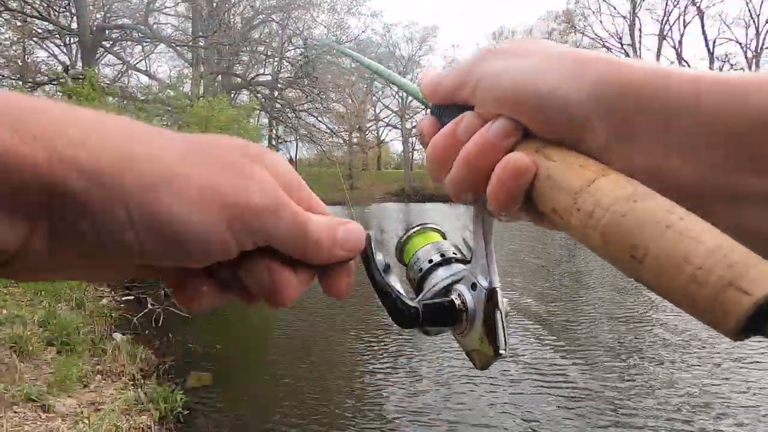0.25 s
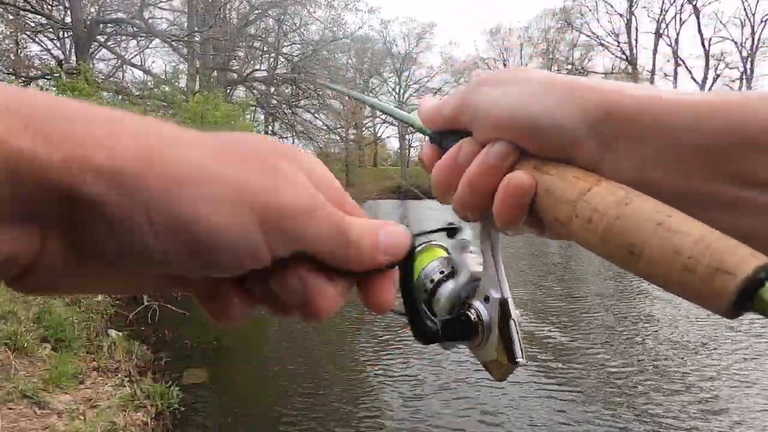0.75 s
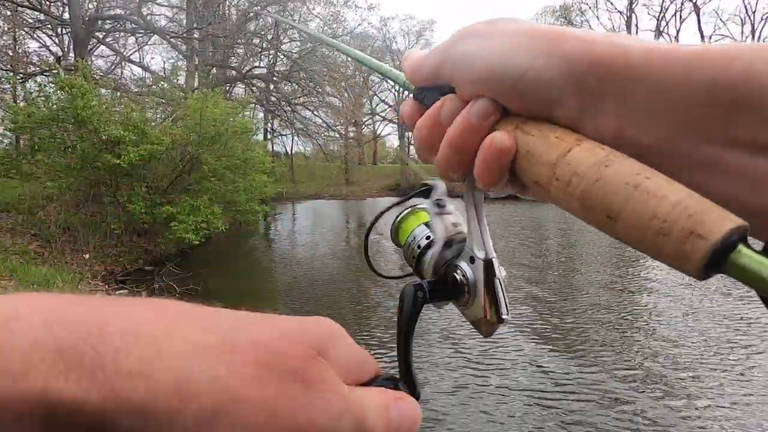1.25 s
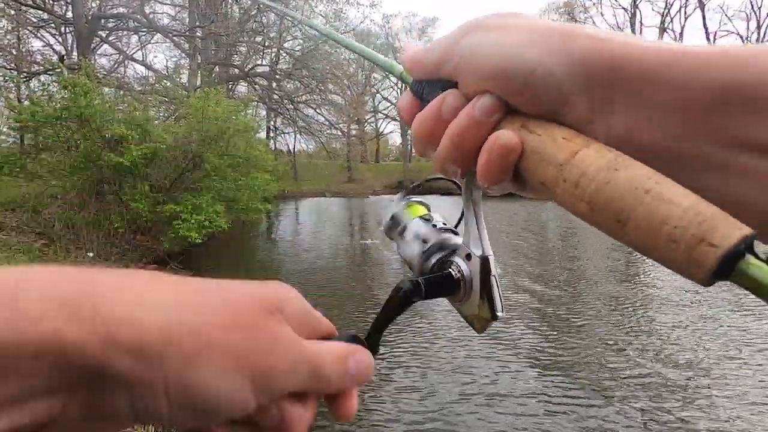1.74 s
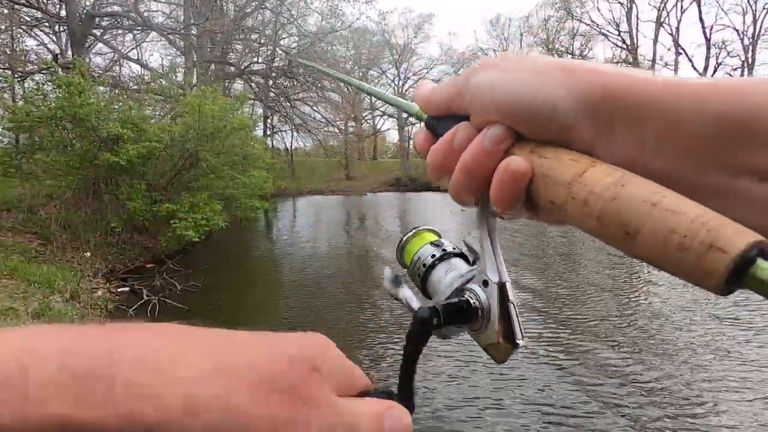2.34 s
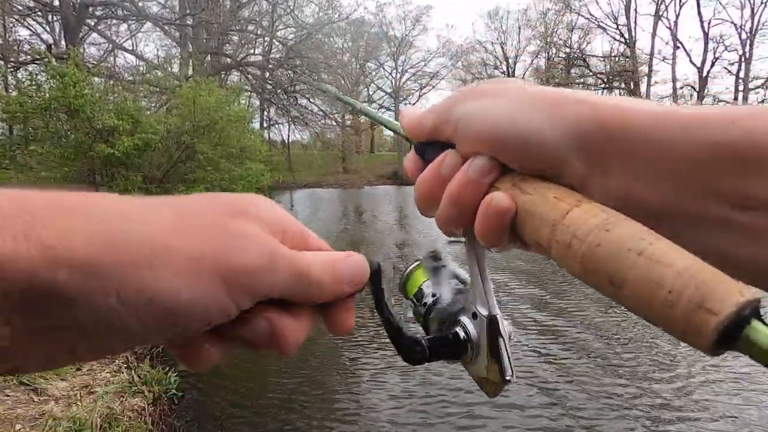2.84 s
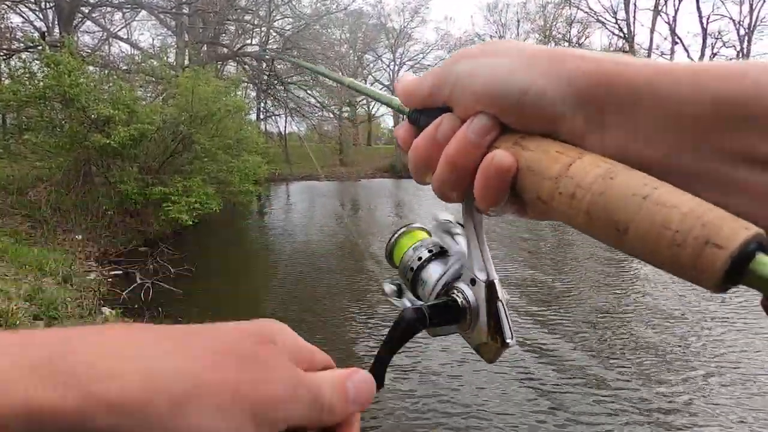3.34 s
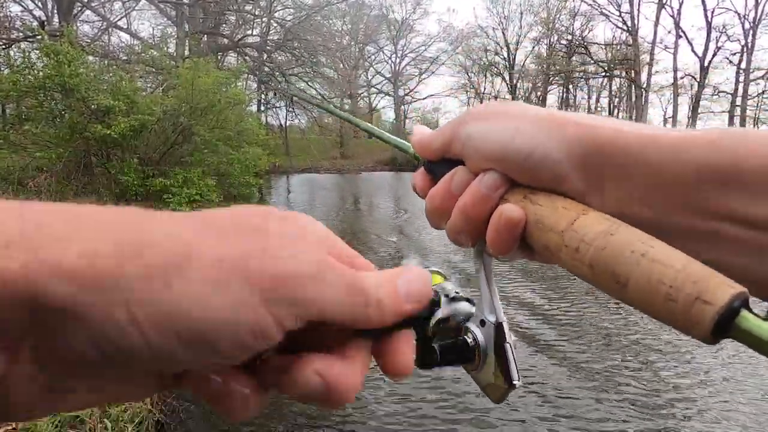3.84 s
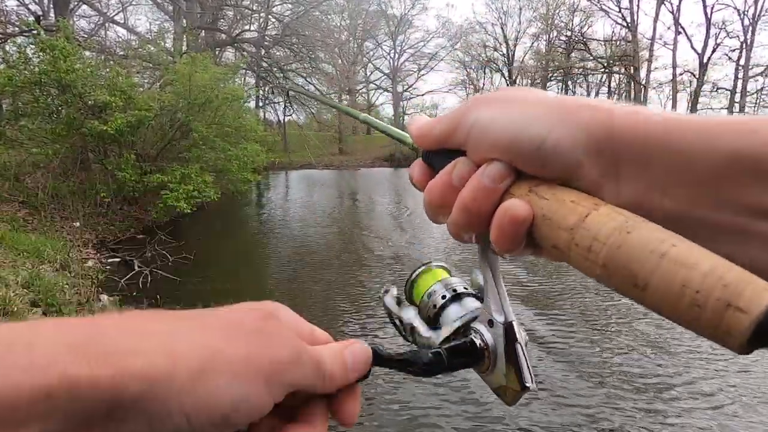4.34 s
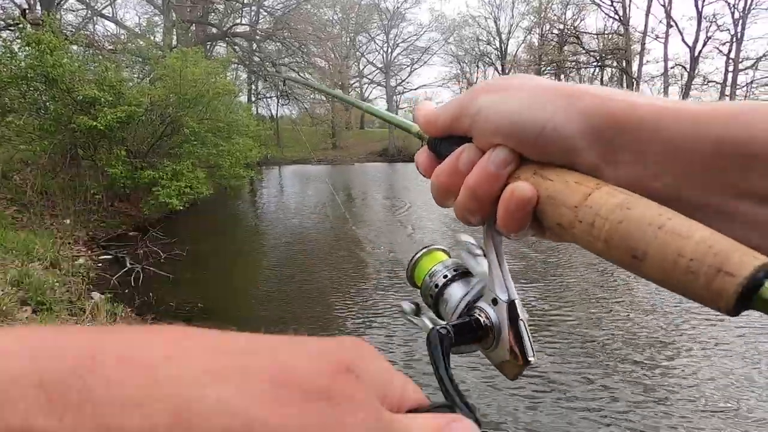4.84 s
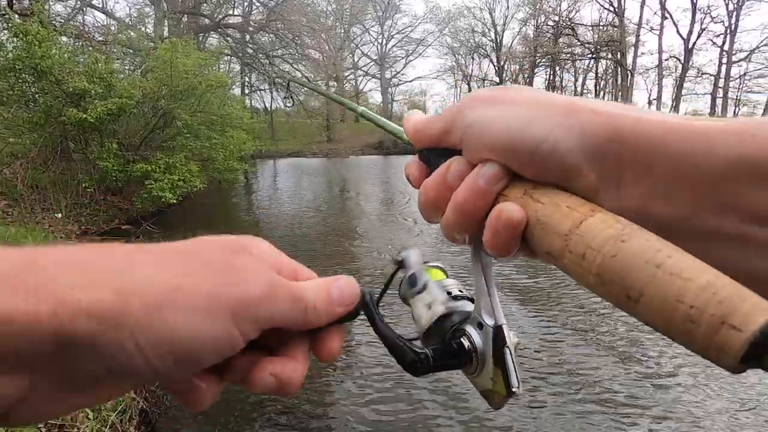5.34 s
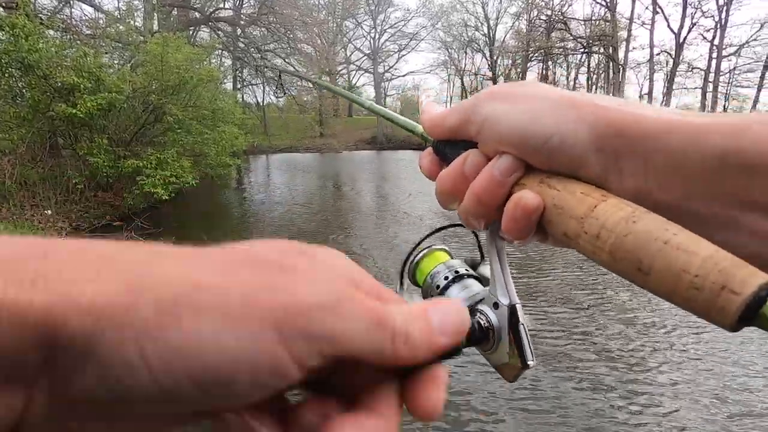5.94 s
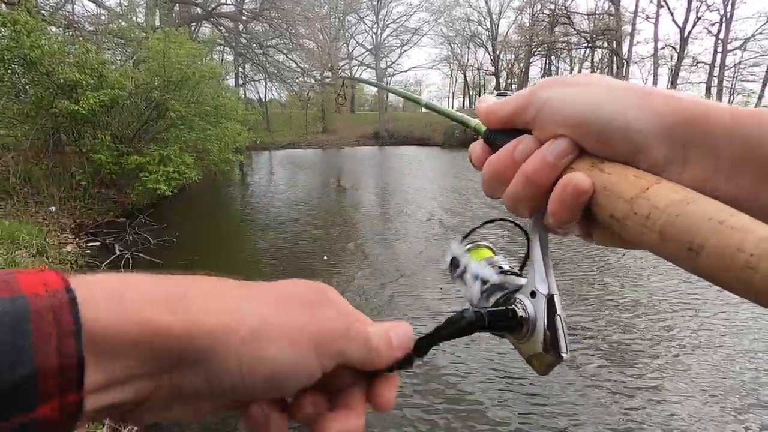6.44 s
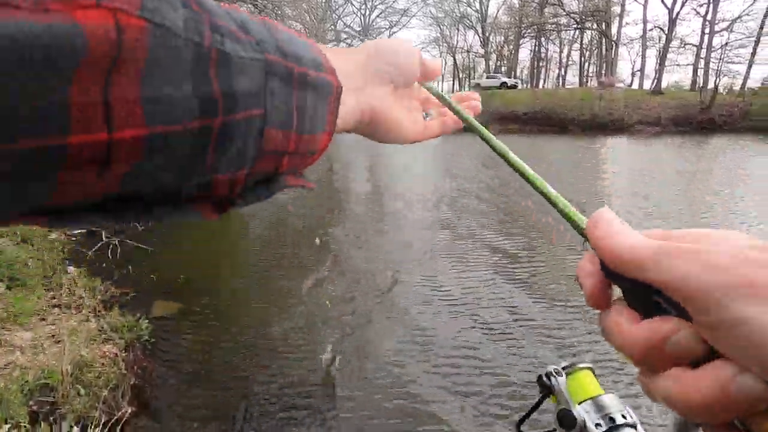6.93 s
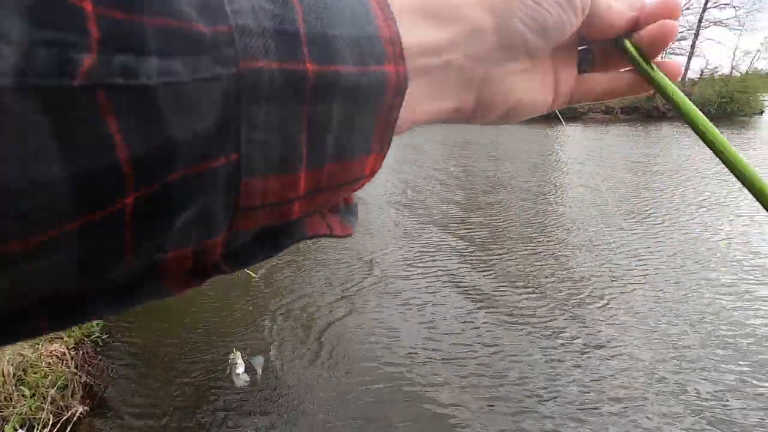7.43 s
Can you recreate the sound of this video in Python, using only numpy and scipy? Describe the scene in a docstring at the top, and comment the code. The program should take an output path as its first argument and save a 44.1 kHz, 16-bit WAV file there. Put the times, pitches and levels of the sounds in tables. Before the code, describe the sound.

Bursts of fast dry drag clicks from a fishing reel, then watery plops and splashing, a sharp rod knock, and wind rumbling on the microphone.

```python
"""A burst of drag clicks opens the scene as a hooked fish is reeled in across a pond on a breezy day.
Each click is impact excitation: a noise snap and the decaying modes of spool and spring. Splashes are
noise bursts and ringing bubbles; ticks, a coasting rotor, creaks and a knocked rod are struck or rubbed
resonators. Far birds whistle as gliding tones. Shaped noise gives wind on the microphone, rustling trees
and a treble hiss, over a faint wavering hum."""
import sys
import numpy as np
from scipy import signal
from scipy.fft import rfft, irfft, next_fast_len
from scipy.io import wavfile
from scipy.ndimage import uniform_filter1d

SR = 44100
rng = np.random.default_rng(int(sys.argv[2]) if len(sys.argv) > 2 else 0)


def dump_mix(stems):
    """Bounce the given channels to the path in sys.argv[1] as a 16-bit WAV at rate SR."""
    frames = np.atleast_2d(stems).T  # one column per channel
    limited = np.clip(frames, -1, 1)  # hard clip at full scale
    pcm = np.round(limited * 32767).astype(np.int16)
    wavfile.write(sys.argv[1], SR, pcm)


N = 338765   # samples

# Teeth of the drag clicker. Each row: time in seconds, body peak in dB, starting level of the
# spring's ring in dB, peak of the treble modes in dB.
CLICKER_TEETH = [(0.0323, -40, -60, -52), (0.059, -43, -61, -51), (0.0694, -39, -64, -52),
                 (0.082, -37, -63, -46), (0.097, -33, -65, -51), (0.221, -40, -73, -49),
                 (0.2534, -36, -62, -48), (0.2718, -39, -61, -48), (0.2824, -39, -60, -51),
                 (0.293, -44, -60, -54), (0.3064, -41, -75, -52), (0.326, -44, -78, -55),
                 (0.3383, -42.5, -63, -55), (0.349, -37, -56, -53), (0.3588, -40, -63, -52),
                 (0.3703, -38.5, -61, -47), (0.382, -41, -57, -56), (0.395, -44, -54, -50),
                 (0.4345, -40, -58, -54), (0.5495, -42, -55, -56), (0.573, -51, -66, -53),
                 (0.5862, -43, -52, -55), (0.596, -40, -53, -53), (0.604, -39, -58, -56),
                 (0.611, -41, -56, -52), (0.619, -40, -70, -53), (0.628, -41, -71, -51),
                 (0.6384, -40, -71, -54), (0.6521, -39, -56, -56), (0.848, -44, -67, -52),
                 (0.865, -36.5, -73, -52), (0.8814, -43, -65, -51), (0.903, -43, -72, -49),
                 (0.9267, -40, -64, -54), (2.607, -40.5, -57, -52), (2.6714, -43.5, -72, -52),
                 (2.8572, -41, -64, -55), (2.9, -37, -68, -55), (2.915, -39, -78, -50),
                 (2.9266, -43, -58, -54), (2.938, -42, -62, -53), (2.9514, -39, -58, -55),
                 (2.9705, -40.5, -69, -54), (4.2413, -45, -74, -55)]
# Low and high modes of the spool. Each row: frequency in Hz, relative level in dB, T60 in seconds.
SPOOL_LOW_MODES = [(1700, -10, 0.0039), (2400, -3, 0.0026), (3170, -10.5, 0.0043), (4160, -8, 0.005),
                   (4650, -10, 0.004), (6295, -14.5, 0.011), (6900, -15.5, 0.0066)]
SPOOL_HIGH_MODES = [(8100, -10, 0.003), (10620, -11, 0.0059), (11620, -7, 0.0055), (12560, -10, 0.0043),
                    (14230, -8, 0.0035), (14370, -12, 0.004)]
SPRING_HZ, SPRING_T60_S = 6628, 0.16
SNAP_DB, SNAP_DECAY_S = 0.5, 0.00071      # broad snap: gain on the treble peak level, time constant
RATTLE_ON_DB, RATTLE_ON_DECAY_S = -16, 0.012   # the spool rattles on: level against the snap, time constant
# Ticks of line, bail and handle. Each row: time in seconds, nominal level in dB, ring frequency in Hz.
REEL_TICKS = [(1.2187, -37, 3950), (1.5895, -42, 3800), (1.658, -38, 3520), (1.7, -36, 4100),
              (3.352, -49, 3900), (3.598, -51, 2600), (3.6653, -37, 3860), (3.7928, -42, 3750),
              (3.904, -39, 3800), (4.14, -38, 4300), (4.2118, -43, 3520), (4.225, -38, 3370),
              (4.277, -34, 3800), (4.5014, -40, 4080), (5.8805, -37, 5130), (5.905, -39, 4410),
              (6.003, -33.5, 6160), (6.253, -41, 3480), (6.593, -33.5, 3570), (6.597, -41, 6500),
              (6.62, -50, 6200), (6.64, -51, 4200), (6.66, -54, 5600), (6.68, -52, 6000),
              (6.725, -52, 5960), (6.731, -45, 4830), (6.833, -49, 6000), (6.846, -48, 5700),
              (6.858, -49, 5360), (6.94, -50, 4700), (6.955, -43, 3500), (6.99, -50, 4300),
              (7.009, -51, 5200)]
# Rattle of the coasting rotor. Each row: time in seconds, rms level in dB.
RATTLE_LEVEL = [(6.25, -140), (6.27, -83), (6.29, -77), (6.335, -73), (6.36, -92), (6.385, -55.5),
                (6.41, -64), (6.44, -62), (6.465, -66), (6.5, -54.5), (6.53, -60), (6.55, -70),
                (6.575, -85), (6.6, -140)]
# Resonances of the rotor. Each row: frequency in Hz, width in Hz, relative level in dB.
ROTOR_MODES = [(2950, 450, 5), (3230, 650, 13), (3520, 120, -10), (6600, 150, -4), (5300, 500, -11),
               (7150, 570, -12), (10000, 300, -26)]
# Squeak of the rotor bearing. Each row: time in seconds, rms level in dB before roughness.
SQUEAK_LEVEL = [(6.27, -140), (6.28, -90), (6.295, -75), (6.34, -75), (6.36, -88), (6.385, -65),
                (6.44, -73), (6.465, -78), (6.505, -67), (6.53, -72), (6.56, -88), (6.58, -140)]
SQUEAK_HZ, SQUEAK_WAVER_HZ, SQUEAK_ROUGH_DB = 5280, 35, 2.5   # the last two are rms swings
# The hand on the rod. Each row: time in seconds, peak of the modes in dB.
ROD_KNOCKS = [(6.973, -24)]
# Modes of the rod. Each row: frequency in Hz, relative level in dB, T60 in seconds.
ROD_MODES = [(860, -10, 0.0067), (1800, 4, 0.0067), (2400, -16, 0.0028), (3000, -4, 0.0064),
             (3800, 0, 0.0041), (4700, 0, 0.003), (5570, 0, 0.0043), (6800, -19, 0.0037),
             (7800, -33, 0.0028), (9400, -27, 0.0018), (11400, -30, .003)]
# Short buzzes, perhaps the tight line creaking in a guide. Each row: start in seconds, end in seconds,
# resonance in Hz, rms level in dB before the swell.
LINE_BUZZES = [(2.534, 2.595, 2600, -61.5), (2.858, 2.916, 3060, -62), (5.111, 5.153, 2390, -52),
               (5.161, 5.19, 2420, -55), (5.205, 5.26, 2350, -60), (5.344, 5.408, 2480, -56.5),
               (5.458, 5.517, 2400, -52.5)]
SLIPS_PER_S = 270
# Brief hisses of line on the roller. Each row: start in seconds, peak in dB, time constant in seconds.
ROLLER_HISSES = [(3.5163, -64, .0015), (3.663, -62, .0015), (3.7219, -64, .0015), (3.9164, -63, .0015),
                 (3.9284, -61, .0015), (4.1255, -66, .002), (4.1948, -65, .02), (4.9572, -64, .004),
                 (5.0121, -63, .004), (5.195, -61, .0015), (5.209, -64, .0015), (5.2879, -65, .003),
                 (5.415, -64, .012), (5.4251, -55, .004), (5.442, -61, .002), (5.485, -63, .003),
                 (5.5538, -65, .003), (5.5806, -64, .02), (5.75, -65, .002), (5.7753, -66, .003),
                 (5.8128, -64, .002), (5.8866, -62, .004), (5.9049, -62, .015), (5.928, -62, .002),
                 (6.0028, -59, .005), (6.0591, -66, .002), (6.0866, -65, .002), (6.148, -63, .003),
                 (6.1598, -60, .0015), (6.1987, -59, .0012), (6.2627, -60, .003), (6.3863, -72, .003),
                 (6.5925, -52, .004), (6.7191, -62, .002)]
# Whirr of the gears. Each row: time in seconds, rms level in dB.
GEAR_LEVEL = [(0, -76), (.45, -72), (.75, -73.5), (.9, -72), (1.1, -81), (1.8, -76.5), (2.2, -77.5),
              (4.5, -79.5), (5.0, -73.5), (5.5, -78), (6.3, -75.5), (6.6, -77), (7.3, -86)]
# Spectrum of the whirr. Each row: frequency in Hz, relative density in dB per Hz.
GEAR_SPECTRUM = [(4500, 1), (6300, 14), (7400, 7.5), (9000, -10), (11500, -18), (13500, -7), (15800, -25)]

# Tail slaps. Each row: time in seconds, starting rms level in dB, middle frequency in Hz, T60 in seconds.
TAIL_SLAPS = [(3.349, -59, 1680, 0.32), (3.352, -53, 2300, 0.016), (3.443, -49, 1290, 0.09),
              (3.451, -46, 1190, 0.18), (3.65, -51.5, 1030, 0.67), (3.764, -44, 990, 0.025),
              (3.794, -53, 2200, .02), (3.904, -42, 2120, 0.025), (4.009, -52, 1480, 0.16),
              (4.198, -54.5, 2170, 0.52), (4.599, -57, 1390, 0.25), (4.744, -54, 1850, 0.11),
              (4.956, -54, 1270, 0.68), (4.957, -37, 890, 0.033), (5.014, -37, 805, 0.034),
              (5.015, -48.5, 1680, 0.088), (5.425, -48, 1300, 0.12), (5.442, -39, 420, 0.034),
              (5.442, -40.5, 1340, 0.047), (5.881, -50, 3230, 0.058), (5.989, -45, 1440, 0.16),
              (6.591, -49, 1520, 0.11)]
# Louder bubbles of the splashing. Each row: time in seconds, peak in dB, starting frequency in Hz.
SPLASH_BUBBLES = [(1.105, -53, 1340), (1.138, -46, 1380), (1.149, -45, 704), (1.205, -51, 950),
                  (1.233, -49, 1110), (1.246, -51, 1230), (1.259, -53, 950), (1.272, -46, 1740),
                  (1.382, -46, 1700), (1.389, -55, 805), (1.412, -45, 1680), (1.57, -47, 1800),
                  (1.656, -47, 1480), (1.68, -49, 670), (1.499, -55, 2600), (1.543, -51, 1490),
                  (1.641, -47, 1870), (1.719, -45.5, 1300), (1.77, -53, 705), (1.764, -46, 2120),
                  (1.781, -49, 1810), (2.138, -51, 2280), (2.157, -52, 834), (2.208, -50, 467),
                  (2.219, -50, 517), (3.336, -47.5, 900), (3.352, -51, 2510), (3.358, -42.5, 1960),
                  (3.371, -44, 990), (3.376, -50, 2080), (3.38, -45, 1060), (3.379, -43, 1520),
                  (3.422, -48, 1710), (3.438, -58, 2670), (3.451, -40, 650), (3.454, -43, 1150),
                  (3.451, -40, 1920), (3.485, -46, 1050), (3.511, -48, 2450), (3.518, -47, 780),
                  (3.557, -46, 680), (3.632, -32.5, 1660), (3.651, -38, 790), (3.666, -46, 700),
                  (3.666, -41, 1780), (3.684, -51, 1720), (3.699, -51, 860), (3.712, -48, 1460),
                  (3.72, -40, 714), (3.734, -44, 2140), (3.764, -45, 960), (3.793, -43.5, 720),
                  (3.832, -44, 690), (3.856, -44, 2050), (3.905, -46, 1450), (3.928, -45, 1600),
                  (3.954, -46.5, 900), (3.902, -46, 1750), (3.925, -45, 2370), (3.988, -42.5, 1600),
                  (4.006, -42, 2060), (4.02, -46, 1350), (4.056, -48, 1320), (4.009, -29.5, 676),
                  (4.007, -41, 1430), (4.109, -40.5, 1340), (4.117, -42.5, 1330), (4.196, -42, 1930),
                  (4.14, -45, 1730), (4.208, -43, 1800), (4.208, -42, 1550), (4.21, -53, 2520),
                  (4.263, -42, 2260), (4.303, -51, 2400), (4.582, -47.5, 2500), (4.594, -46, 720),
                  (4.607, -40.5, 1640), (4.65, -44.5, 1700), (4.651, -44, 422), (4.742, -44.5, 2140),
                  (4.743, -47, 970), (4.764, -48, 1190), (4.957, -58, 1820), (4.651, -41, 760),
                  (4.678, -43.5, 700), (4.958, -34, 1090), (4.964, -40, 685), (4.98, -37, 850),
                  (4.988, -46, 2455), (4.994, -45, 990), (5.017, -48, 2110), (4.992, -46, 1400),
                  (5.006, -42, 2480), (5.013, -36, 746), (5.021, -40, 1490), (5.024, -43, 450),
                  (5.033, -37, 1450), (5.125, -46, 790), (5.152, -42, 1710), (5.179, -42, 1050),
                  (5.374, -39.5, 710), (5.386, -42, 1770), (5.405, -41, 1630), (5.379, -53, 2455),
                  (5.424, -42, 1670), (5.427, -43, 1390), (5.434, -40, 1060), (5.445, -44, 2430),
                  (5.469, -44, 1440), (5.482, -42, 1450), (5.444, -32.5, 1440), (5.444, -38, 1940),
                  (5.443, -49, 840), (5.469, -42, 1090), (5.486, -45, 620), (5.558, -36.5, 1460),
                  (5.581, -43, 1020), (5.619, -42, 1030), (5.678, -45, 1500), (5.705, -45.5, 784),
                  (5.727, -39.5, 2220), (5.682, -45, 1120), (5.705, -45, 2100), (5.712, -41.5, 930),
                  (5.73, -45, 640), (5.767, -41, 2510), (5.831, -46, 3050), (5.858, -43, 2540),
                  (5.884, -40, 2200), (5.958, -44, 880), (5.979, -43, 1220), (5.985, -49, 2400),
                  (5.993, -45, 1160), (6.0, -42, 2950), (5.887, -41, 2720), (5.957, -44, 1490),
                  (6.004, -38, 504), (6.055, -44, 794), (6.086, -44, 1210), (6.11, -43, 1230),
                  (6.123, -46, 1700), (6.154, -45, 525), (6.197, -46, 3240), (6.297, -48, 1400),
                  (6.387, -49, 3060), (6.406, -49, 2220), (6.429, -44, 3280), (6.443, -44, 1740),
                  (6.591, -57, 500), (6.602, -51, 1830), (6.618, -48, 880), (6.699, -42.5, 1700),
                  (6.707, -45, 2300), (6.717, -46, 1770), (6.592, -39, 910), (6.606, -44, 910),
                  (6.605, -44, 2700), (6.665, -53, 2280), (6.7, -50, 1920), (6.719, -46, 2200),
                  (6.821, -47, 2640)]
BUBBLE_CYCLES, BUBBLE_ONSET_CYCLES = 26.2, 0.61   # length, at which it is 60 dB down; onset scale
BUBBLE_CHIRP = 0.0045   # extra phase in cycles per squared cycle
BUBBLE_HOLD = 1.05   # exponent of the decay: above 1 the ring holds at first, then dies quickly
# Long gurgles. Each row: start in seconds, length in seconds, first, middle and last frequency in Hz,
# rms level in dB at the height of the swell.
LONG_GURGLES = [(1.575, 0.0062, 435, 430, 480, -44), (3.722, 0.032, 467, 482, 468, -50),
                (4.03, 0.013, 613, 673, 593, -38.5), (4.043, 0.012, 720, 820, 950, -48),
                (4.202, 0.0297, 790, 877, 1170, -40), (5.272, 0.029, 420, 410, 414, -44.5),
                (5.305, 0.013, 700, 783, 1040, -35.5), (5.646, 0.055, 350, 344, 352, -50),
                (5.99, 0.022, 430, 480, 570, -53), (6.084, 0.061, 300, 300, 434, -46.5),
                (6.277, 0.032, 840, 878, 970, -48)]
# Churned water. Each row: time in seconds, slosh rms level in dB, spray rms level in dB.
CHURN_LEVELS = [(0.0, -57.5, -63), (0.28, -61.5, -61.5), (0.62, -62, -64.5), (1.16, -61.5, -65),
                (1.47, -61.5, -58.5), (2.14, -58, -62.5), (2.39, -59.5, -65), (3.21, -64.5, -67),
                (3.59, -58, -61), (3.89, -56, -58), (4.43, -64, -66.5), (4.72, -62, -64.5),
                (5.0, -54.5, -63), (5.15, -61.5, -58), (5.65, -58, -55.5), (6.67, -61, -64),
                (7.12, -60, -71), (7.68, -62.5, -109)]
# Spectra of the small bubbles. Each row: frequency in Hz, relative level in dB.
SLOSH_SPECTRUM = [(250, -6.5), (400, -5.5), (750, -0.5), (1100, -4.5), (1500, -24)]
SPRAY_SPECTRUM = [(900, -6.5), (1500, -3.5), (2400, -2.5), (3500, -7), (5000, -8.5), (6500, -49),
                  (8000, -56)]

# Bird whistles. Each row: start in seconds, length in seconds, first, middle and last frequency in Hz,
# rms level in dB at the height of the swell, before the flutter.
BIRD_WHISTLES = [(.135, 0.024, 2400, 2400, 2400, -60.5), (.18, 0.05, 2420, 2400, 2290, -63),
                 (.94, 0.038, 2280, 2150, 2060, -63), (2.02, 0.03, 2720, 2620, 2560, -66),
                 (2.097, .056, 2220, 2370, 2200, -63), (2.172, .016, 2830, 2660, 2520, -63),
                 (2.186, 0.038, 2510, 2490, 2520, -59), (2.664, 0.024, 2960, 2820, 2720, -55.5),
                 (3.064, 0.047, 4250, 3780, 3000, -69), (3.109, .012, 2950, 2800, 2620, -56.5),
                 (3.173, 0.033, 2500, 2560, 2600, -62), (3.2, 0.027, 2620, 2720, 2530, -54.5),
                 (3.24, 0.089, 2290, 2280, 2250, -59), (3.715, 0.022, 2840, 2730, 2600, -60),
                 (3.817, 0.04, 2520, 2790, 2720, -56), (7.148, 0.085, 3150, 3170, 3130, -75)]

# Wind on the microphone. Each row: time in seconds, buffeting and rumble rms levels in dB before gusting.
WIND_LEVELS = [(0, -41.5, -64), (.15, -38, -55), (.9, -39, -53.5), (1.25, -40, -56.5), (1.45, -47, -51.5),
               (2.1, -40, -52), (2.5, -41, -52), (3.3, -45, -52.5), (4.2, -47.5, -52), (4.9, -45, -51),
               (5.1, -37.5, -51.5), (5.42, -35.5, -51), (5.6, -44.5, -52.5), (6.1, -42, -49.5),
               (6.6, -38, -51.5), (6.75, -32.5, -43), (7.0, -32, -49.5), (7.08, -22.5, -40.5),
               (7.16, -18.5, -41.5), (7.23, -35, -44.5), (7.5, -27.5, -45.5), (7.68, -35.5, -55)]
# Spectra of the wind. Each row: frequency in Hz, relative density in dB per Hz.
BUFFET_SPECTRUM = [(3, -6.5), (8, -2), (20, -0.5), (35, -18), (60, -25.5), (100, -32.5)]
RUMBLE_SPECTRUM = [(25, -38), (45, 3), (70, -4.5), (110, -5), (160, -12), (250, -21.5), (400, -28)]
GUST_RATE_HZ, GUST_SWING_DB = 2.5, 1.2   # bandwidth and rms swing of the random gusting
# Far rustle of trees. Each row: time in seconds, rms level in dB before its slow drift.
RUSTLE_LEVEL = [(0, -60), (1.2, -59.5), (6.7, -59), (7.1, -63), (7.68, -63)]
# Spectrum of the rustle. Each row: frequency in Hz, relative density in dB per Hz.
RUSTLE_SPECTRUM = [(150, -4), (250, -8.5), (450, -9.5), (750, -10), (1300, -11.5), (2500, -17), (5000, -26),
                   (8300, -41.5), (11000, -61)]
# Steady treble hiss. Each row: time in seconds, rms level in dB.
TREBLE_LEVEL = [(0, -79), (1.05, -79.5), (1.54, -77.5), (2.44, -80), (3.87, -78.5), (4.47, -79.5),
                (5.71, -79.5), (6.6, -78), (7.25, -79), (7.68, -79)]
# Spectrum of the treble hiss. Each row: frequency in Hz, relative density in dB per Hz.
TREBLE_SPECTRUM = [(5500, -1), (7000, -3), (8300, 2), (12000, 1), (15800, -1)]
HUM_HZ, HUM_PEAK_DB = 103.35, -57.5   # centre values of the wavering hum
STOP_HZ = 16100   # from here up the recorded sound is at least 50 dB down


def amp(db):
    """Level to linear gain: 20 dB is a factor of ten in amplitude."""
    return 10 ** (np.asarray(db) / 20)


def rms_one(x):
    """Normalisation: scale to unit rms."""
    return x / np.sqrt(np.mean(x ** 2) + 1e-20)


def in_time(rows):
    """Linear interpolation: each column of a curve, one value per sample."""
    s, *columns = np.transpose(rows)
    return [np.interp(np.arange(N) / SR, s, c) for c in columns]


def coloured(x, spectrum):
    """Spectral shaping: weight the input's Fourier bins by a curve on log frequency; unit rms."""
    size = next_fast_len(N)
    hz, db = np.transpose(spectrum)
    log_bins = np.log(np.arange(size // 2 + 1) * SR / size + 1e-3)
    gain = amp(np.interp(log_bins, np.log(hz), db, left=-120, right=-120))
    return rms_one(irfft(rfft(x, size) * gain, size)[:N])


def drift(rate_hz):
    """Low-passed chance: noise through two equal poles at rate_hz, with unit rms."""
    step = 40   # samples between slow values
    r = np.exp(-2 * np.pi * rate_hz * step / SR)
    settle = 2000
    noise = rng.standard_normal(N // step + settle + 2)
    slow = signal.lfilter([1], [1, -2 * r, r * r], noise)[settle:]
    return np.interp(np.arange(N) / step, np.arange(len(slow)), rms_one(slow))


def ring(clicks, hz, t60):
    """Impulse response of a damped resonator: a unit click starts a decaying sine of height 1."""
    r, w = amp(-60 / (t60 * SR)), 2 * np.pi * hz / SR
    return signal.lfilter([0, np.sin(w)], [1, -2 * r * np.cos(w), r * r], clicks + 1e-18)


def add(out, s, sound):
    """Superposition: add a sound into the mix from time s."""
    i = round(s * SR)
    out[i:i + len(sound)] += sound[:N - i]


def strike(times, levels_db, modes, spread_db, detune, contact_s):
    """Modal excitation: each blow gives every mode its own strength, sign and tuning over a finite contact."""
    out, t = np.zeros(N), np.arange(1024) / SR
    hz, mode_db, t60 = np.transpose(modes)[:, :, None]
    decays = amp(mode_db - 60 * t / t60)
    onset = 1 - np.exp(-(t / contact_s) ** 2)
    chance = rng.standard_normal((len(times), 3, len(modes), 1))
    for s, db, (size, sign, tuning) in zip(times, levels_db, chance):
        strengths = amp(spread_db * size) * np.sign(sign)
        sines = np.sin(2 * np.pi * hz * (1 + detune * tuning) * t)
        blow = onset * (strengths * decays * sines).sum(axis=0)
        add(out, s - contact_s, amp(db) * blow / np.abs(blow).max())
    return out


def glides(calls, peak_at, sharpness, echo_db):
    """Frequency modulation: pure tones glide, swell to a peak part-way and fade, with one 22 ms echo."""
    out = np.zeros(N)
    for s, length, first_hz, middle_hz, last_hz, db in calls:
        part = np.linspace(0, 1, round(length * SR))
        bend_hz = middle_hz - (first_hz + last_hz) / 2
        hz = first_hz + (last_hz - first_hz) * part + bend_hz * np.sin(np.pi * part)
        swell = np.interp(part, [0, peak_at, 1], [0, 1, 0]) ** sharpness
        tone = np.sqrt(2) * amp(db) * swell * np.sin(2 * np.pi * np.cumsum(hz) / SR)
        add(out, s, tone)
        add(out, s + 0.022, amp(echo_db) * tone)
    return out


def grains(per_s, spectrum, cycles, spread_db, count):
    """Random excitation: small bubbles born in clumps ring in one of count pitches; unit rms."""
    sizes = amp(spread_db * np.minimum(rng.exponential(1, N), 4)) * rng.choice([-1, 1], N)
    born = rng.random(N) < per_s * amp(3.3 * drift(15)) / SR
    dealt = rng.integers(0, count, N)   # pitch class of each bubble
    hz, db = np.transpose(spectrum)
    out = np.zeros(N)
    for k, f in enumerate(np.geomspace(hz[0], hz[-1], count)):
        rings = ring(sizes * born * (dealt == k), f, cycles / f)
        out += amp(np.interp(np.log(f), np.log(hz), db)) * rms_one(rings)
    return rms_one(out)


def drag():
    """Impact excitation: each tooth snaps broadly, rings the spool, stops the spring and rings it afresh."""
    times, body_db, spring_db, treble_db = np.transpose(CLICKER_TEETH)
    out = strike(times, body_db, SPOOL_LOW_MODES, spread_db=2.5, detune=0.04, contact_s=0.0004)
    out += strike(times, treble_db, SPOOL_HIGH_MODES, spread_db=5.0, detune=0.037, contact_s=0.00056)
    t = np.arange(1500) / SR
    highpass = signal.butter(1, 2500, "high", fs=SR, output="sos")
    snaps = signal.sosfilt(highpass, rng.standard_normal((len(times), len(t))))
    decay = np.exp(-t / SNAP_DECAY_S) + amp(RATTLE_ON_DB) * np.exp(-t / RATTLE_ON_DECAY_S)
    shape = (1 - np.exp(-t / 0.0003)) * decay
    for s, db, snap in zip(times, treble_db, snaps):
        add(out, s, amp(db + SNAP_DB) * snap * shape)
    for s, until, db in zip(times, [*times[1:], N / SR], spring_db):
        t = np.arange(0, min(until - s, SPRING_T60_S), 1 / SR)
        add(out, s, amp(db - 60 * t / SPRING_T60_S) * np.sin(2 * np.pi * SPRING_HZ * t))
    return out


def ticks():
    """Light impact: a short dull noise crack with one brief ring."""
    out, t = np.zeros(N), np.arange(400) / SR
    lowpass = signal.butter(5, 7000, fs=SR, output="sos")
    cracks = signal.sosfilt(lowpass, rng.standard_normal((len(REEL_TICKS), len(t))))
    for (s, db, hz), crack in zip(REEL_TICKS, cracks):
        tone = 0.19 * np.sin(2 * np.pi * hz * t) * np.exp(-t / 0.0032)
        add(out, s, amp(db) * (tone + 0.26 * crack * np.exp(-t / 0.00079)))
    return out


def rattle():
    """Multiple impacts: dense uneven contacts ring the modes of the coasting rotor."""
    contacts = (rng.random(N) < 3000 / SR) * rng.standard_normal(N)
    # T60 of a resonance is about 2.2 over its width
    rings = sum(amp(db) * rms_one(ring(contacts, hz, 2.2 / width)) for hz, width, db in ROTOR_MODES)
    return amp(in_time(RATTLE_LEVEL)[0]) * rms_one(rings)


def squeak():
    """Modulated tone: the bearing's squeak is a sine with wavering pitch and rough level."""
    phase = 2 * np.pi * np.cumsum(SQUEAK_HZ + SQUEAK_WAVER_HZ * drift(30)) / SR
    level_db = in_time(SQUEAK_LEVEL)[0] + SQUEAK_ROUGH_DB * drift(70)
    return amp(level_db) * np.sqrt(2) * np.sin(phase)


def knock():
    """Impact on a rod: a snap, briefly ringing modes, shivering guides and a soft rebound near the main mode."""
    out = strike(*np.transpose(ROD_KNOCKS), ROD_MODES, spread_db=3.5, detune=0, contact_s=0.0001)
    s, t = ROD_KNOCKS[0][0], np.arange(SR // 10) / SR
    snap = signal.lfilter([0.5], [1, -0.5], rng.standard_normal(len(t)))
    add(out, s, amp(-47) * np.exp(-t / 0.00046) * snap)
    band = signal.butter(2, [1200, 6000], "band", fs=SR, output="sos")
    shiver = rms_one(signal.sosfilt(band, rng.standard_normal(len(t))))
    add(out, s, amp(-54.5) * np.exp(-t / 0.016) * shiver)
    swell = np.exp(-((t - 0.0025) / 0.0017) ** 2)
    add(out, s + 0.009, amp(-40) * swell * np.sin(2 * np.pi * 1600 * t))
    return out


def buzzes():
    """Stick-slip: evenly timed slips and a little noise drive one broad resonance."""
    out = np.zeros(N)
    for start, end, hz, db in LINE_BUZZES:
        t = np.arange(0, end - start, 1 / SR)
        slips = np.diff(np.floor(t * SLIPS_PER_S), prepend=0) * amp(0.49 * rng.standard_normal())
        rasp = slips + 0.089 * rng.standard_normal(len(t))
        swell = np.abs(np.sin(np.pi * t / t[-1])) ** 0.5
        add(out, start, amp(db) * swell * rms_one(ring(rasp, hz, t60=0.0091)))
    return out


def hisses():
    """Friction noise: line on the roller gives a high noise band that starts fast and dies away."""
    out, t = np.zeros(N), np.arange(SR // 8) / SR
    band = signal.butter(3, [10300, 14500], "band", fs=SR, output="sos")
    for s, db, decay_s in ROLLER_HISSES:
        burst = np.exp(-t / decay_s) * signal.sosfilt(band, rng.standard_normal(len(t)))
        add(out, s, amp(db) * burst / np.abs(burst).max())
    return out


def gears():
    """Amplitude-modulated noise: the whirr of the gears is a fluttering, coloured hiss."""
    teeth = rng.standard_normal(N) * amp(2.0 * drift(56) + 2.8 * drift(25))
    return amp(in_time(GEAR_LEVEL)[0]) * coloured(teeth, GEAR_SPECTRUM)


def slaps():
    """Froth noise: a crackling band under two octaves wide starts at once and decays exponentially."""
    out, t = np.zeros(N), np.arange(SR // 4) / SR
    noise = rng.standard_normal((len(TAIL_SLAPS), 2, len(t)))
    for (s, db, hz, t60), (hiss, crackle) in zip(TAIL_SLAPS, noise):
        band = signal.butter(3, [hz / 1.8, hz * 1.8], "band", fs=SR, output="sos")
        fade = amp(db - 60 * t / t60)
        froth = rms_one(fade * signal.sosfilt(band, hiss * crackle ** 2))
        add(out, s, np.sqrt(np.mean(fade ** 2)) * froth)
    return out


def bubbles():
    """Bubble resonance: a dying sine climbs in pitch as the bubble nears the surface."""
    out = np.zeros(N)
    for s, db, hz in SPLASH_BUBBLES:
        turns = np.arange(int(BUBBLE_CYCLES / hz * SR)) * hz / SR   # cycles at the starting pitch
        onset = 1 - np.exp(-(turns / BUBBLE_ONSET_CYCLES) ** 2)
        shape = onset * amp(-60 * (turns / BUBBLE_CYCLES) ** BUBBLE_HOLD)
        tone = np.sin(2 * np.pi * (turns + BUBBLE_CHIRP * turns ** 2))
        add(out, s, amp(db) * shape / shape.max() * tone)
    return out


def gurgles():
    """Gliding bubble resonance: long gurgles are bending tones that swell early."""
    return glides(LONG_GURGLES, peak_at=0.16, sharpness=0.6, echo_db=-24)


def churn():
    """Bubble ensemble: slosh and spray of many small bubbles, with a trickle of longer-ringing ones."""
    slosh_db, spray_db = in_time(CHURN_LEVELS)
    slosh = grains(500, SLOSH_SPECTRUM, cycles=12.4, spread_db=1.0, count=10)
    spray = grains(1200, SPRAY_SPECTRUM, cycles=13.0, spread_db=0.5, count=13)
    trickle_spectrum = [(600, -9.0), (1200, -6), (2800, -4.0), (5500, -8.5)]   # Hz, relative dB
    trickle = grains(120, trickle_spectrum, cycles=45, spread_db=2.5, count=13)
    return amp(slosh_db) * slosh + amp(spray_db) * spray + amp(spray_db - 10.5) * trickle


def birds():
    """Reflection and scintillation: far whistles echo off the bank and flutter in the moving air."""
    whistles = glides(BIRD_WHISTLES, peak_at=0.39, sharpness=0.23, echo_db=-14)
    return whistles * amp(2.6 * drift(60))


def wind():
    """Turbulent pressure: slow lumps of fairly even size, and a faster gusting rumble."""
    buffet_db, rumble_db = in_time(WIND_LEVELS)
    lumps = coloured(rng.standard_normal(N), BUFFET_SPECTRUM)
    power = uniform_filter1d(uniform_filter1d(lumps ** 2, size=4000), size=4000)
    even = rms_one(lumps / (power + 0.05) ** 0.45)   # strong lumps are held down
    buffet = amp(buffet_db + GUST_SWING_DB * drift(GUST_RATE_HZ)) * even
    rumble = amp(rumble_db + 0.5 * drift(18)) * coloured(rng.standard_normal(N), RUMBLE_SPECTRUM)
    return buffet + rumble


def trees():
    """Broadband noise: the far rustle of trees, falling towards the treble and drifting in level."""
    level_db = in_time(RUSTLE_LEVEL)[0] + 0.55 * drift(2.1)
    return amp(level_db) * coloured(rng.standard_normal(N), RUSTLE_SPECTRUM)


def treble_hiss():
    """Stationary noise: a steady treble hiss with a slowly changing level."""
    return amp(in_time(TREBLE_LEVEL)[0]) * coloured(rng.standard_normal(N), TREBLE_SPECTRUM)


def hum():
    """Pure tone: a low far hum wavers a little in pitch and level."""
    phase = 2 * np.pi * np.cumsum(HUM_HZ + 0.8 * drift(1.5)) / SR
    return amp(HUM_PEAK_DB + 2 * drift(0.36)) * np.sin(phase)


def scene():
    """Superposition: all pressures add at one microphone."""
    reel = drag() + ticks() + rattle() + squeak() + knock() + buzzes() + hisses() + gears()
    water = slaps() + bubbles() + gurgles() + churn()
    background = wind() + trees() + treble_hiss() + hum()
    return (reel + water + birds() + background)[None]


def record(dry):
    """Low-pass filtering: a steep filter cuts the top of the spectrum."""
    return signal.sosfilt(signal.cheby2(14, 50, STOP_HZ, fs=SR, output="sos"), dry)


dry = scene()
out = record(dry)
dump_mix(out)
```